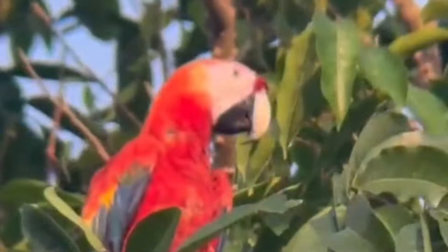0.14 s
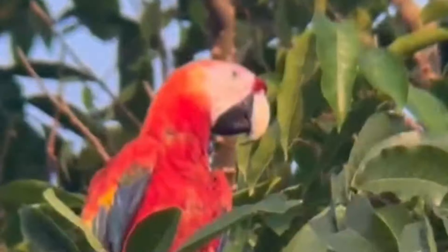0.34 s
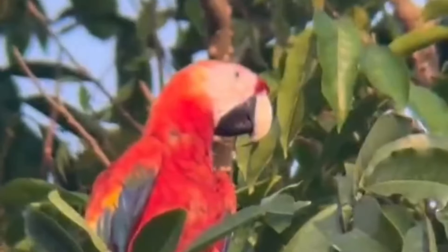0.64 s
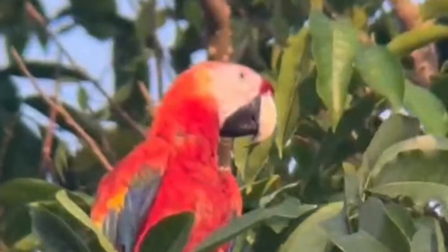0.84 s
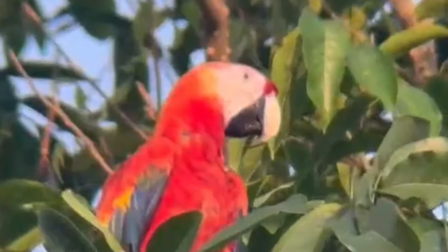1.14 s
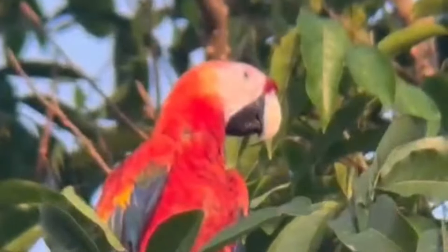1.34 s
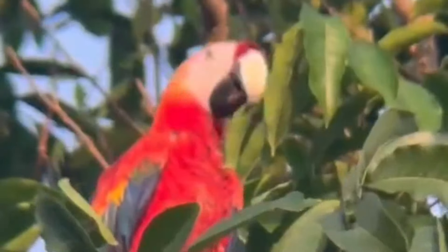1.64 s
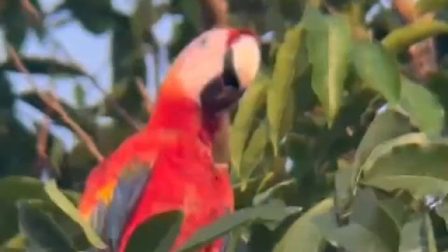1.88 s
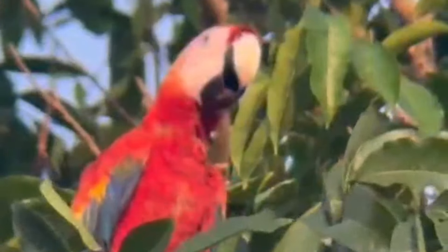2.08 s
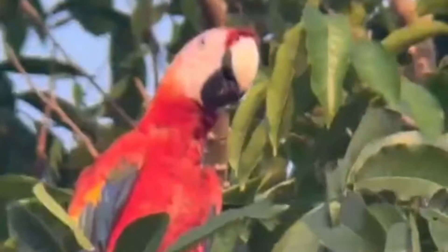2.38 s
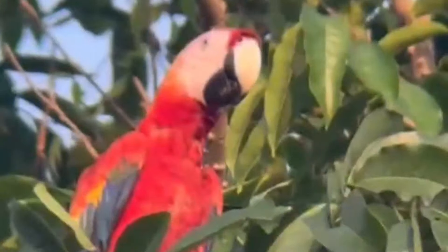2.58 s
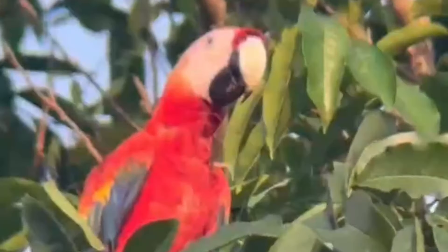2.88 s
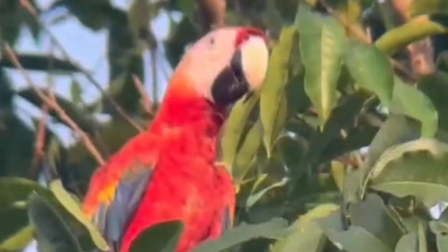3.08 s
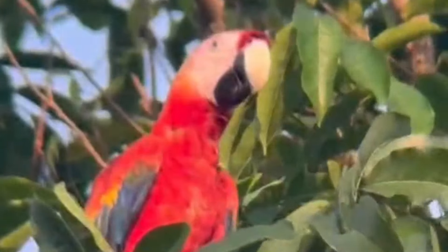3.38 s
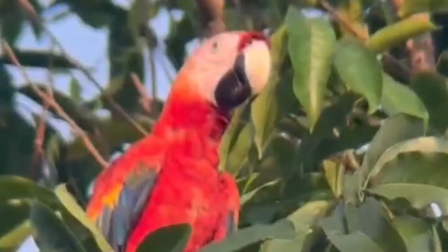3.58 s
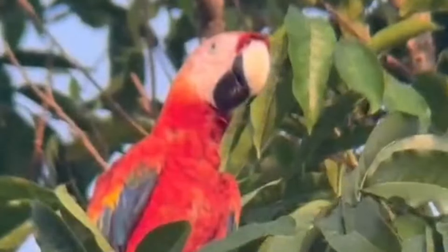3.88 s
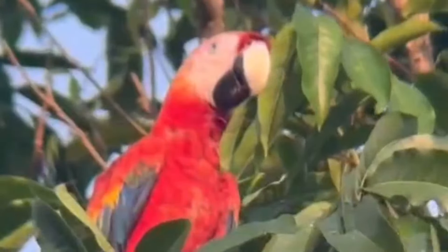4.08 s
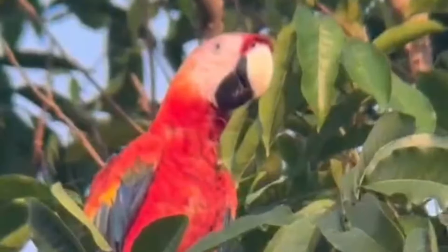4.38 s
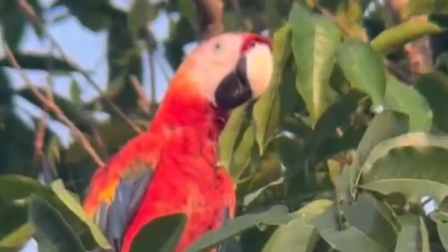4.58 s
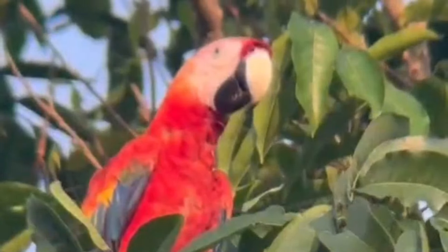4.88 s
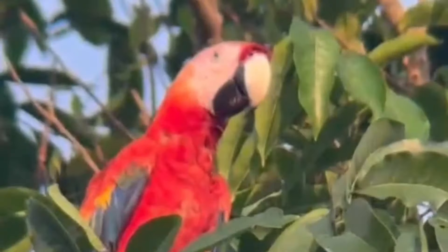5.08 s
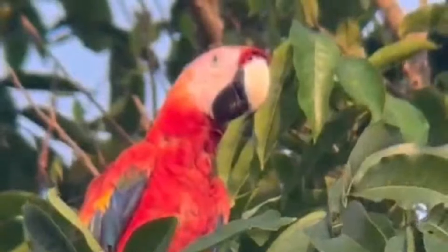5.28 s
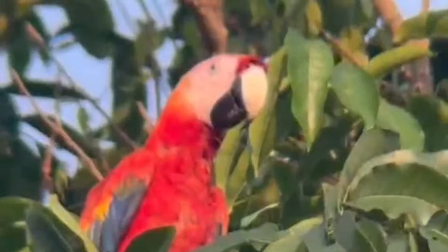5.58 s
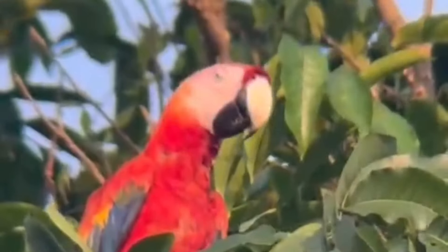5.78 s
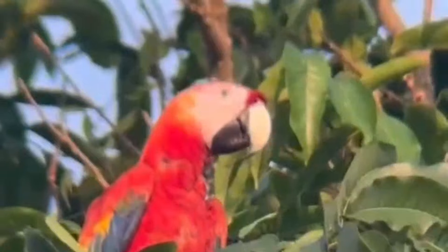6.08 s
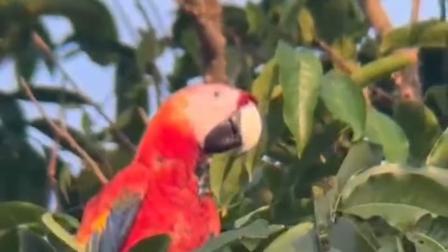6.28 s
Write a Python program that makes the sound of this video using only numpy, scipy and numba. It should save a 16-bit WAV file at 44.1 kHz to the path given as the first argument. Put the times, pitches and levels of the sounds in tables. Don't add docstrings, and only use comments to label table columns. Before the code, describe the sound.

A quiet forest edge heard through a phone microphone with softened, patchy treble. A constant low engine rumble with a droning tone near the bottom runs throughout, under light leaf hiss and a faint, high, fast-pulsing insect shimmer; sparse cricket buzzes rise off to the side in the first 1.5 seconds. At about 1.95-2.4 s a large parrot squawks once, by far the loudest event: a sudden, rough, nasal rasp, full for about a tenth of a second, then breaking into six or seven rapid uneven throbs, with a short dull echo from trunks and leaves. From 2.4 to 4 s small birds twitter and chirp faintly. From 4.05 s a distant bird repeats a phrase of quick ticks and a two-part rising whistle, roughly every 0.36 s, six times, the last nearly lost. At 6.28 s a soft low thud sags in pitch and fades.

```python
import sys
import numpy as np
from scipy import signal
from scipy.fft import rfft, irfft
from scipy.io import wavfile
from scipy.ndimage import uniform_filter1d
from numba import njit

SR = 44100
rng = np.random.default_rng(int(sys.argv[2]) if len(sys.argv) > 2 else 0)


def wav_out(sig):
    wavfile.write(sys.argv[1], SR, np.round(np.clip(np.atleast_2d(sig).T, -1, 1) * 32767).astype(np.int16))


def invert_db(level):
    return 10 ** (np.asarray(level, dtype=float) / 20)


N = 284004
TIME = np.arange(N) / SR
FREQ = np.fft.rfftfreq(N, 1 / SR) + 1e-3


def unit(x):
    return x / np.sqrt(np.mean(x ** 2))


def columns(table):
    t_s, *rest = np.transpose(table)
    return [np.interp(TIME, t_s, column) for column in rest]


def walk(rate_hz):
    hold = int(SR / rate_hz)
    levels = np.repeat(rng.standard_normal(N // hold + 1), hold)
    slewed = uniform_filter1d(uniform_filter1d(levels, hold), hold)
    return unit(slewed[:N])


@njit
def svf(x, hz, width_hz):
    y, band, low = np.empty(len(x)), 0., 0.
    for i in range(len(x)):
        g, k = np.tan(np.pi * hz[i] / SR), width_hz / hz[i]
        v = (band + g * (x[i] - low)) / (1 + g * (g + k))
        band, low, y[i] = 2 * v - band, low + 2 * g * v, k * v
    return y


def ring(x, hz, width_hz):
    hz = hz + np.zeros(len(x))
    return svf(svf(x, hz, 1. * width_hz), hz, 1. * width_hz)


def hump(hz, half_hz, steep):
    return np.exp(-abs((FREQ - hz) / half_hz) ** steep)


def syrinx(rough):
    pulse_hz = 262.7
    closures_hz = 2 * pulse_hz * (1 + .02 * walk(70) + .02 * walk(22))
    cycle = np.cumsum(closures_hz) / SR
    count = cycle.astype(int)
    wraps = np.flatnonzero(np.diff(count))
    late, uneven = rng.standard_normal((2, len(wraps)))
    at = wraps + (rough * 11 * late).astype(int)
    weak = np.where(count[wraps] % 2, .35, 1.)
    pulses = np.zeros(N)
    pulses[np.clip(at, 0, N - 1)] = weak * invert_db(1.6 * uneven)
    breath = np.exp(-(cycle / 2 % 1) / 0.33) * rng.standard_normal(N)
    return np.sqrt(1 - rough) * unit(pulses) + np.sqrt(rough) * unit(breath)


# t/s, held level/dB, beak opening/0-1
SQUAWK = [
    (1.965, -57, 0.2),
    (1.985, -44, 0.1),
    (2.008, -32, 0.6),
    (2.066, -31, 1),
    (2.13, -32.5, 0.94),
    (2.19, -47, 1),
    (2.28, -53.5, 0.92),
    (2.345, -45.5, 0.93),
    (2.385, -60, 0.7),
]
# t/s, level/dB, length/ms
THROBS = [
    (1.955, -45, 14),
    (2.168, -28.5, 17),
    (2.195, -29.5, 13.4),
    (2.224, -30.5, 19),
    (2.26, -32, 24),
    (2.293, -35, 13),
    (2.319, -32.5, 13),
    (2.336, -31.5, 29),
]


def parrot():
    held_db, opening = columns(SQUAWK)

    def beak(shut, wide):
        return shut + (wide - shut) * opening

    source = syrinx(rough=.48)
    throat = ring(source, beak(1560, 1470) + 70 * walk(30.03), 410)
    throat += 0.6 * ring(source, 1415, 260) - 0.64 * ring(source, 1894, 300)
    chest = ring(source, beak(1100, 1050) + 40 * walk(24.9), 470)
    mouth = ring(source, 2620 + 50 * walk(30), 330) + 0.75 * ring(source, 2250, 200)
    edge_db = -10 + 0.28 * (held_db - held_db.max())
    rasp = ring(source, 3980, 730) - invert_db(edge_db) * ring(source, 5220, 770) + 0.25 * ring(source, 6250, 400)

    voice = unit(throat) - invert_db(beak(-2, -6.5)) * unit(chest)
    voice += invert_db(beak(-24, -5.5)) * unit(mouth)
    voice += invert_db(beak(-14, -15.5)) * unit(rasp)
    voice = unit(signal.sosfilt(signal.butter(4, [730, 6900], "band", fs=SR, output="sos"), voice))
    voice = voice / uniform_filter1d(voice ** 2, size=330) ** .35

    inside = (TIME > SQUAWK[0][0]) & (TIME < SQUAWK[-1][0])
    flutter_db = 0.5 * walk(76.2)
    power = inside * invert_db(held_db + flutter_db) ** 2
    for t_s, db, ms in THROBS:
        power = power + invert_db(db) ** 2 * np.exp(-(2500 * (TIME - t_s) / ms) ** 2)
    return voice * np.sqrt(power)


def trees(x, t60_s=0.7, wet_db=-13, gap_s=0.011):
    t = TIME[:SR]
    echo = rng.standard_normal((2, SR)) * np.exp(-np.log(1000) * t / t60_s) * (t > gap_s)
    echo = signal.lfilter([1], [1, -.4], echo)
    echo *= invert_db(wet_db) / np.sqrt(np.sum(echo[0] ** 2)) * np.array([[1], [.1]])
    return signal.fftconvolve(x[None], echo, axes=1)[:, :N]


def thud():
    start_s, start_hz, sag_hz, sag_s = 6.275, 136.2, 27.7, 0.092
    level_db, fade_db_per_s, attack_s = -33.5, 86.5, .03
    t = np.maximum(TIME - start_s, 0)
    hz = start_hz - sag_hz / (1 + np.exp(-(t - sag_s) / .02))
    phase = 2 * np.pi * np.cumsum(hz) / SR
    size = invert_db(level_db - fade_db_per_s * t) * np.clip(t / attack_s, 0, 1)
    return np.sqrt(2) * size * (np.sin(phase) + 0.092 * np.sin(2 * phase))


def add(out, t_s, from_hz, to_hz, ms, db, buzz_hz, side):
    n = int(ms * SR / 500)
    u = np.linspace(-1, 1, n)
    wobble = unit(uniform_filter1d(rng.standard_normal(SR), size=24))[:n]
    hz = (from_hz + to_hz) / 2 + (to_hz - from_hz) * u + buzz_hz * wobble
    size = np.sqrt(2) * invert_db(db) * np.exp(-4 * u ** 2)
    tone = size * np.sin(2 * np.pi * np.cumsum(hz) / SR)
    at = int(t_s * SR) - n // 2
    out[:, at:at + n] += tone * np.array([[1], [side]])


# t after start/s, from f/Hz, to f/Hz, length/ms, level/dB
PHRASE = [
    (0, 4840, 4790, 24, -66),
    (.027, 2650, 2710, 20, -59),
    (.052, 3060, 3060, 18, -66),
    (.128, 2690, 2670, 20, -62),
    (.224, 1760, 1880, 28, -55.5),
    (.254, 1935, 1995, 32, -55),
]
# t/s, ticks level/dB, closing whistle level/dB
PHRASE_STARTS = [
    (4.048, -2, -6),
    (4.403, 0, 0),
    (4.768, -1, -1),
    (5.135, -4, -4),
    (5.502, -1, 0),
    (5.872, 0, -16),
]
# t/s, f/Hz, level/dB
BUZZES = [(0.399, 8830, -69.5), (.64, 8750, -70), (.989, 9400, -73), (1.19, 8650, -66), (1.45, 8720, -70),
          (4.771, 8700, -72), (4.98, 8800, -70.5), (5.919, 8640, -73), (6.03, 8700, -75), (5.56, 9360, -65)]
# t/s, f/Hz, level/dB
SEEPS = [
    (1.92, 6950, -63),
    (4.449, 7240, -62.5),
]
# t/s, f/Hz, length/ms, level/dB, buzz width/Hz
CHIRPS = [(2.025, 8990, 50, -72, 40), (2.086, 8540, 70, -69, 61), (2.145, 8600, 45, -76, 40.5),
          (2.33, 8630, 45, -75.5, 40), (2.936, 3790, 19, -59.5, 40), (3.355, 5837, 26, -68, 80),
          (3.46, 4940, 23, -68, 151), (3.50, 5325, 87, -65.5, 900), (3.585, 4350, 30, -68, 149),
          (3.68, 4340, 68, -67, 250), (3.74, 3740, 70, -66.5, 150), (3.8, 4480, 170, -72.5, 50),
          (4.50, 6530, 30, -66, 80), (4.62, 5140, 220, -74, 250), (4.82, 3050, 50, -59, 60),
          (4.92, 4850, 260, -77, 200), (5.63, 3050, 40, -63, 60), (5.93, 2950, 40, -58, 60)]


def far_birds():
    out = np.zeros((2, N))
    for start_s, tick_db, whistle_db in PHRASE_STARTS:
        for t_s, from_hz, to_hz, ms, db in PHRASE:
            part_db = tick_db if from_hz > 2300 else whistle_db
            add(out, start_s + t_s, from_hz, to_hz, ms, db + part_db, buzz_hz=8, side=.15)
    rise_hz, fall_hz = 511, 820
    for t_s, hz, db in BUZZES:
        add(out, t_s, hz - rise_hz / 2, hz + rise_hz / 2, 60, db, buzz_hz=510, side=1.5)
    for t_s, hz, db in SEEPS:
        add(out, t_s, hz + fall_hz / 2, hz - fall_hz / 2, 79, db, buzz_hz=190, side=.5)
    for t_s, hz, ms, db, buzz_hz in CHIRPS:
        add(out, t_s, hz, hz, ms, db, buzz_hz, side=.12)
    return out + trees(out[0], t60_s=.5, wet_db=-12)


# t/s, length/s, level/dB
BOUTS = [(2.5, 0.05, -56), (2.358, 0.13, -45), (2.7, 0.302, -58.5), (2.862, 0.054, -55),
         (3.544, .04, -58.5), (3.663, 0.039, -53), (4.17, 0.15, -54.5), (4.5, 0.28, -53),
         (4.87, 0.22, -54.5), (5.257, 0.24, -53.5), (5.64, 0.15, -51.5), (6.056, .14, -56)]


def band_bouts():
    size = invert_db(-69.5)
    for t_s, length_s, db in BOUTS:
        size = size + invert_db(db) * np.exp(-(2 * (TIME - t_s) / length_s) ** 2)
    band = unit(irfft(rfft(rng.standard_normal(N)) * hump(3195, 250, 5.2), N))
    return size * invert_db(5.0 + 3.4 * walk(14)) * band


# f/Hz, half width/Hz, mid level/dB, side level/dB, throb rate/Hz, throb depth/0-1
INSECTS = [
    (7483, 467, -64.5, -65.5, 120, 0.23),
    (6713, 290, -73.5, -78, 32, 0.2),
    (9533, 630, -73, -66.5, 66, 0.07),
]


def insects(bird):
    swell_db_per_s = 0.5
    dip_from_db, dip_slope, dip_s = -36.5, 6, 0.053
    low_db = swell_db_per_s * (TIME - TIME.mean())
    bird_db = 10 * np.log10(np.maximum(uniform_filter1d(bird ** 2, int(dip_s * SR)), 1e-12))
    high_db = -dip_slope * np.maximum(bird_db - dip_from_db, 0)
    out = np.zeros((2, N))
    for hz, half_hz, mid_db, side_db, rate_hz, depth in INSECTS:
        throb_hz = rate_hz * (1 + .02 * walk(5.5))
        throb = 1 + depth * np.sin(2 * np.pi * np.cumsum(throb_hz) / SR)
        swell_db = (low_db if hz < 8500 else high_db) + 0.3 * walk(8)
        rasp, other = rfft(rng.standard_normal((2, N))) * hump(hz, half_hz, 1.93)
        mid = unit(irfft(rasp, N))
        side = unit(irfft(-1j * rasp + .25 * other, N))
        mid_size = invert_db(mid_db + swell_db)
        side_size = invert_db(side_db + np.maximum(swell_db, -9))
        out += throb * np.array([mid_size * mid, side_size * side])
    return out


def coloured(white, points, swell_db, flicker_db):
    hz, db = np.transpose(points)
    spectrum = rfft(white) * invert_db(np.interp(np.log(FREQ), np.log(hz), db))
    octave = np.clip(np.log2(FREQ / 40), 0, 8)
    total = np.zeros(N)
    for k in range(9):
        band = irfft(spectrum * np.clip(1 - abs(octave - k), 0, 1), N)
        total += band * invert_db(swell_db * walk(1.64) + flicker_db * walk(10))
    return unit(total)


# f/Hz, density/dB per Hz
AIR = [(12, -45.5), (20, -7), (30, -12.5), (40, -5), (59, -6.5), (87, -2), (113, -6), (134, -7.5),
       (202, -13), (244, -16.5), (568, -21.5), (1320, -23.5), (2520, -31.5), (3210, -48), (3800, -43.5),
       (6300, -48.5), (8190, -76), (13900, -120)]
# f/Hz, density/dB per Hz
AIR_SIDE = [(24, -30), (40, -11), (73, -37.5), (115, -26.5), (150, -17.5), (520, 7.5), (984, 0.5),
            (1330, -3.5), (2200, -41.5), (2860, -77), (4840, -120)]


def air():
    lull_s, lull_length_s, lull_db = 4.2, 0.98, -4.5
    mid_db = -44 - 0.19 * TIME
    side_db = -65 + .5 * TIME + lull_db * np.exp(-((TIME - lull_s) / lull_length_s) ** 2)
    white, other = rng.standard_normal((2, N))
    drone = unit(ring(rng.standard_normal(N), 87 + 2.6 * walk(1.0), 8.6))
    mid = coloured(white, AIR, 0.1, 0.71) + invert_db(-7) * drone
    side = coloured(0.49 * white + other, AIR_SIDE, 1.5, 1.7)
    puffs = invert_db(-76 + 7 * walk(4)) * unit(ring(other, 62, 60))
    return np.array([invert_db(mid_db) * mid, invert_db(side_db) * side + puffs])


def scene():
    bird = parrot()
    perch_leaves = trees(bird, t60_s=0.0445, wet_db=-9.0, gap_s=0.00076)
    mid, side = air() + insects(bird) + far_birds() + perch_leaves + trees(bird)
    mid = mid + 0.77 * bird + thud() + band_bouts()
    side = side - 0.019 * bird
    return np.array([mid + side, mid - side])


def starve(x, under_db, spread_db, loud_share, from_hz):
    hz, _, z = signal.stft(x, SR, nperseg=2048, noverlap=1536)
    bands = z[:1024].reshape(128, 8, -1)
    power = uniform_filter1d(np.mean(abs(bands) ** 2, axis=1), size=3, axis=1)
    power_db = 10 * np.log10(power + 1e-20)
    loud_db = 10 * np.log10(np.sum(abs(z[40:140]) ** 2, axis=0) + 1e-20)
    waver = unit(uniform_filter1d(rng.standard_normal(power_db.shape), size=7, axis=1))
    limit_db = under_db + spread_db * waver + loud_share * (loud_db - np.median(loud_db))
    keep = np.clip((power_db - limit_db) / 1.5 + .5, 0, 1)
    keep[:hz[::8].searchsorted(from_hz)] = 1
    z[:1024] *= np.repeat(keep, 8, axis=0)
    return signal.istft(z, SR, nperseg=2048, noverlap=1536)[1][:N]


def roll_off(x):
    return signal.sosfilt(signal.butter(12, 10320, fs=SR, output="sos"), x)


def record(dry):
    notch = invert_db(-30 * hump(3210, 265, 5.0))
    bass_cut = 1 / np.sqrt(1 + (38 / FREQ) ** 9)
    left, right = irfft(rfft(dry) * notch * bass_cut, N)
    mid = starve((left + right) / 2, -99, 5.0, 0.47, from_hz=2500)
    side = starve((left - right) / 2, -99, 9.5, 0.36, from_hz=1100)
    return roll_off(np.array([mid + side, mid - side]))


dry = scene()
out = record(dry)
wav_out(out)
```